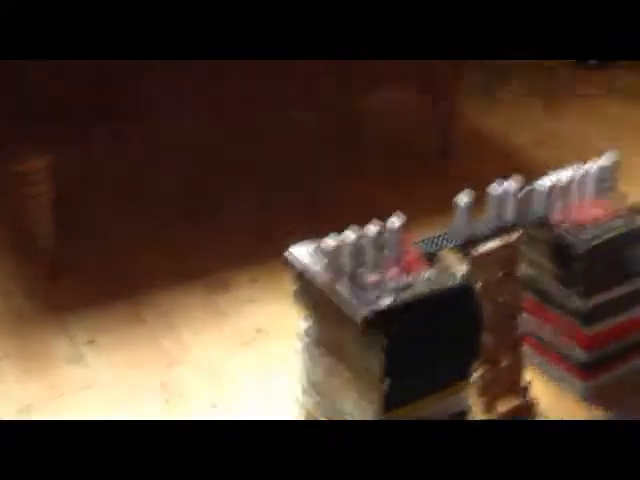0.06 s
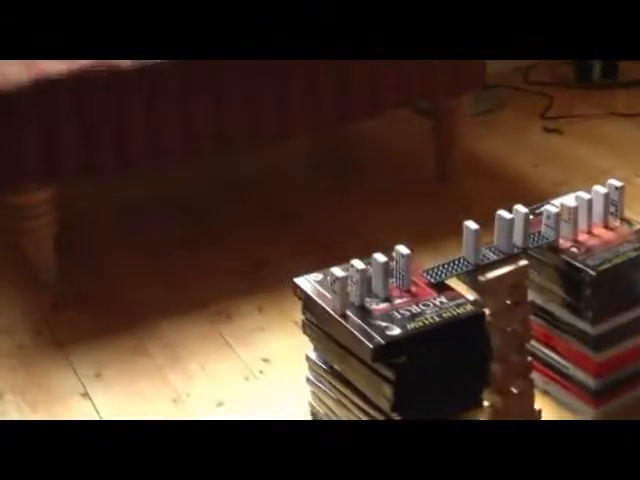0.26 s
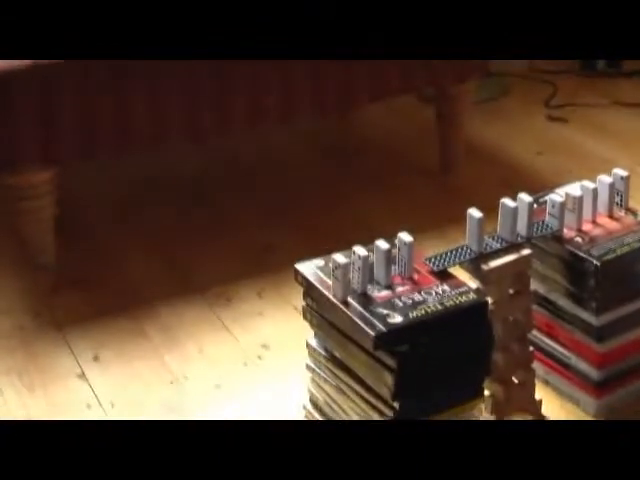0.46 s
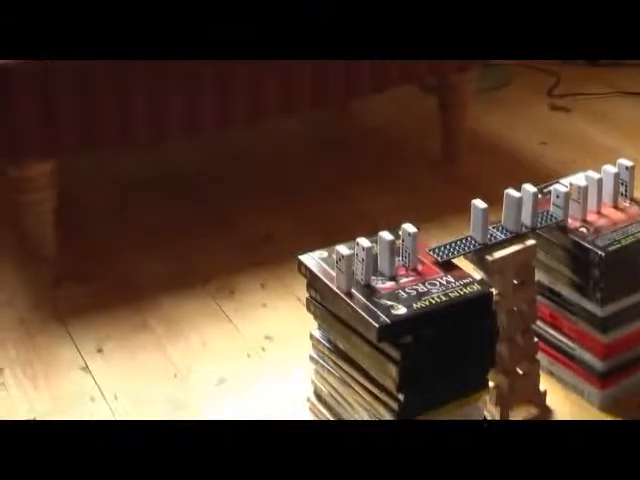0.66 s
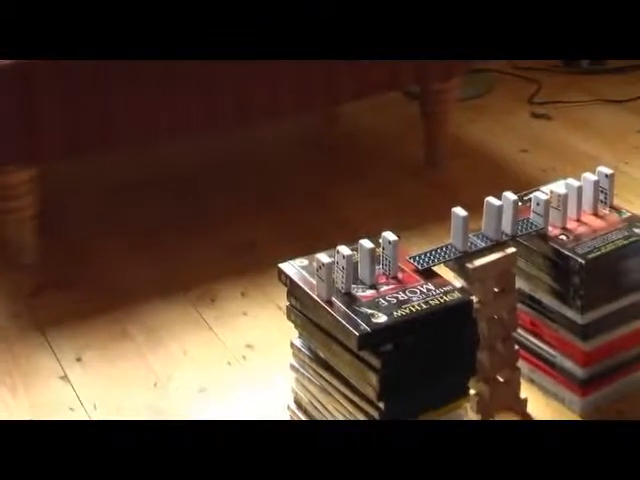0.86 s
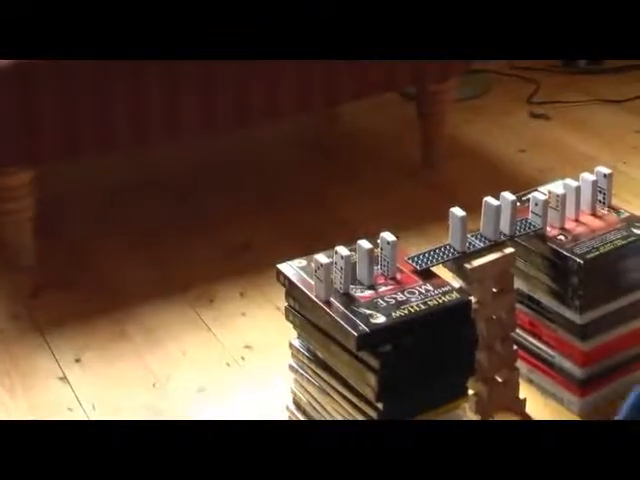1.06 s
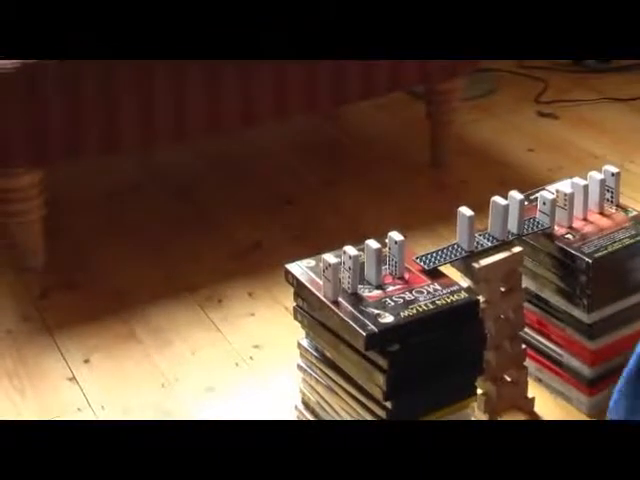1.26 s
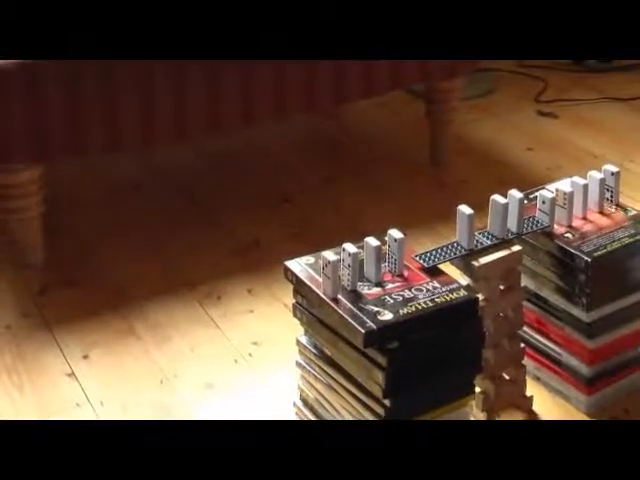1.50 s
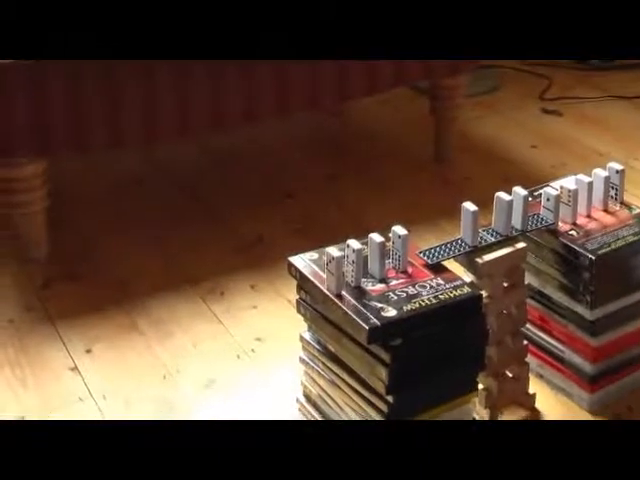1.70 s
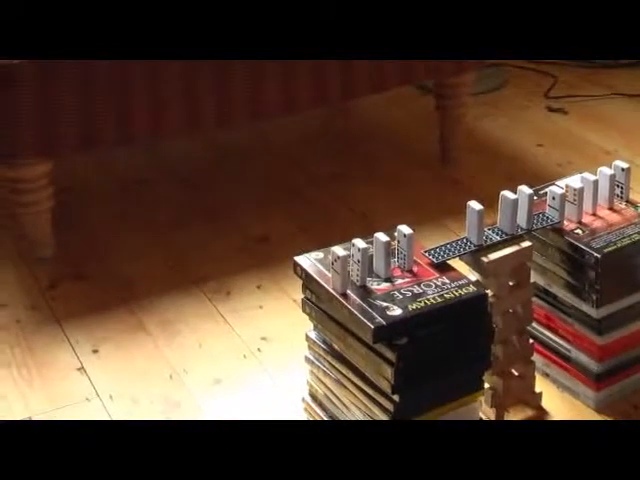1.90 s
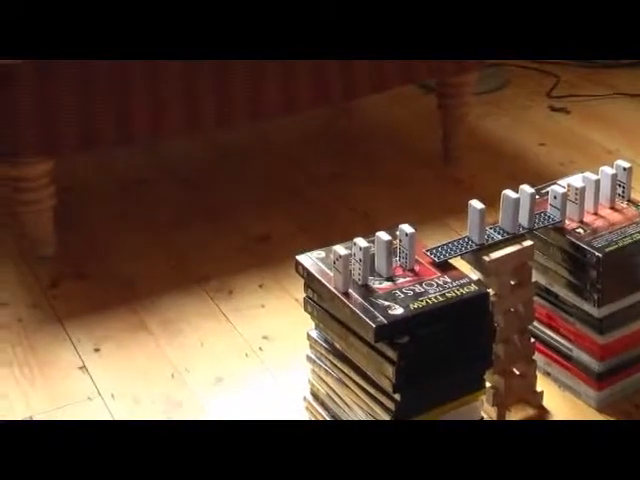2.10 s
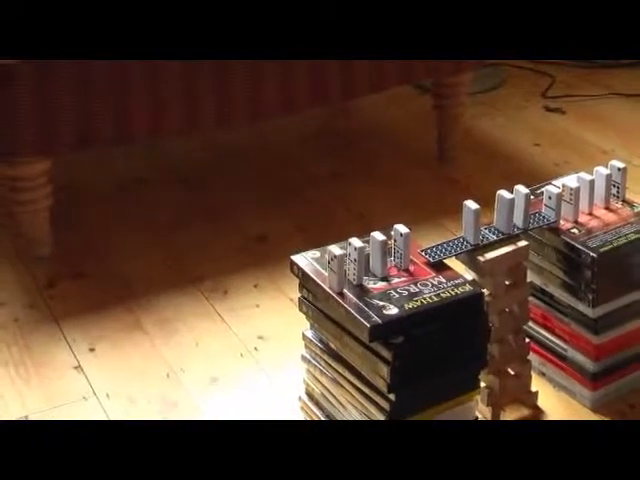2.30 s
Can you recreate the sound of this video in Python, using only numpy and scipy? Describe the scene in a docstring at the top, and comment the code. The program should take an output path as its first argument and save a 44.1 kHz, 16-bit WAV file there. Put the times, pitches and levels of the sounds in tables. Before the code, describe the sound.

Dominoes topple across stacks of books and disc cases, clacking and clattering indoors.

```python
"""A row of dominoes topples across stacks of books and disc cases in a live, wooden-floored room.
Tiles clack brightly against each other and knock on the hollow stacks; a dense clatter follows,
then a dull blow, a ringing tap on a case and a last crash whose pieces rattle to rest.
The stereo microphone has the row slightly to its right, far enough off to take in plenty of room."""
import sys
import numpy as np
from scipy import signal
from scipy.fft import rfft, irfft, next_fast_len
from scipy.io import wavfile

SR = 44100
rng = np.random.default_rng(int(sys.argv[2]) if len(sys.argv) > 2 else 0)


def wav_out(sig):
    """Save sig, one row per channel (or a flat mono array), as 16-bit PCM at SR to the path in sys.argv[1]."""
    wavfile.write(sys.argv[1], SR, np.round(np.clip(np.atleast_2d(sig).T, -1, 1) * 32767).astype(np.int16))


N = 108045


def amp(db):
    """Decibels to gain."""
    return 10 ** (np.asarray(db) / 20)


def curve_at(points, hz):
    """A curve's value on a log-frequency axis."""
    points_hz, values = np.transpose(points)
    return np.interp(np.log(hz + 1), np.log(points_hz), values)


def add(mix, start_s, sound):
    """Lays a sound into the mix."""
    part = mix[..., round(start_s * SR):][..., :sound.shape[-1]]
    part += sound[..., :part.shape[-1]]


def click(colour, size=2048):
    """The sharpest causal click that has the given colour (a function from Hz to dB)."""
    hz = abs(np.fft.fftfreq(size, 1 / SR))
    log_gain = np.log(amp(colour(hz)))
    return np.fft.ifft(np.exp(np.conj(signal.hilbert(log_gain)))).real


def ring(modes, detune=1, rise_s=0.00014):
    """A struck body rings with one dying tone per mode."""
    t = np.arange(16384) / SR
    tones = sum(amp(db - 60 * t / t60) * np.cos(2 * np.pi * hz * detune * t) for hz, db, t60 in modes)
    return (1 - np.exp(-t / rise_s)) * tones


def bend(sound, lag_s=0.001055, corner_hz=1620):
    """A bending cover spreads a blow in time: the lower waves arrive later."""
    size = 2 * len(sound)
    hz = np.fft.rfftfreq(size, 1 / SR)
    delay_s = lag_s / np.hypot(1, hz / corner_hz)
    phase = -2 * np.pi * np.cumsum(delay_s) * hz[1]
    return irfft(rfft(sound, size) * np.exp(1j * phase), size)[:len(sound)]


# How long the room rings: freq_hz, t60_s
ROOM_DECAY = [(100,0.35), (300,0.6), (800,0.58), (2000,0.5754), (4500,0.52), (8200,0.4944), (11500,0.38)]
# Colour of its echoes: freq_hz, level_db
ROOM_COLOUR = [(100, 1), (300, 3.5), (1000, 7.9), (3000, 7.4), (9000, 6.7)]
# Side against mid at the microphone: freq_hz, side_db
ROOM_WIDTH = [(100, -12.5), (400, -10), (1200, -8.5), (4000, -5.5), (9000, -6.5)]


def room_response(echo_db, build_s=0.002, early_db=5.5, early_t60_s=0.14, size=256):
    """Direct sound reaches the microphone, then dense echoes build up and die band by band."""
    t = np.arange(SR) / SR
    hz, frame_s, noise = signal.stft(rng.standard_normal((2, SR)), SR, nperseg=size)
    hz = hz[:, None]
    late = amp(-60 * frame_s / curve_at(ROOM_DECAY, hz))
    early = amp(early_db - 60 * frame_s / early_t60_s)
    fade = np.hypot(late, early)
    fade /= np.sqrt((fade ** 2).sum(1, keepdims=True) * size / 2)
    mid, side = noise * fade * amp(curve_at(ROOM_COLOUR, hz))
    side *= amp(curve_at(ROOM_WIDTH, hz))
    response = signal.istft(np.array([mid + side, mid - side]), SR, nperseg=size)[1][:, :SR]
    response *= amp(echo_db) * (1 - np.exp(-(t / build_s) ** 2))
    response[0, 1] += 1  # the direct sound reaches the left one sample late
    response[1, 0] += 1
    return response


# Lean to the right at the microphone: freq_hz, right_db
BALANCE = [(100, -2.1), (300, -0.61), (600, .5), (1300, 1.44), (9000, 0.78)]


def in_room(hits, echo_db=0, spot_count=7):
    """Hits land on several spots a little to the right, each with its own echoes."""
    spots, size = np.zeros((spot_count, N)), next_fast_len(N + SR)
    for k, (start_s, sound) in enumerate(hits):
        add(spots[k % spot_count], start_s, sound)
    heard = sum(rfft(spot, size) * rfft(room_response(echo_db), size) for spot in spots)
    right_db = curve_at(BALANCE, np.fft.rfftfreq(size, 1 / SR))
    return irfft(heard * amp([-right_db, right_db]), size)[:, :N]


# Colour of the room tone: freq_hz, level_db
ROOM_TONE = [(30,-37), (80,0), (200,4), (300,-0.5), (700,-8), (1500,-13), (4000,-22), (5500,-31.5),
             (9000,-23.5), (12000,-34.5)]


def room_tone(level_db=-50):
    """A quiet, low hush all around the microphone."""
    hz = np.fft.rfftfreq(N, 1 / SR)
    mid, side = rfft(rng.standard_normal((2, N))) * amp(curve_at(ROOM_TONE, hz))
    side *= amp(curve_at(ROOM_WIDTH, hz))
    air = irfft(np.array([mid + side, mid - side]), N)
    return amp(level_db) * air / air.std()


# Modes of the hollow case, the stiff cover and the whole stack: pitch_hz, level_db, t60_s
CASE_MODES = [(176.8,-13,0.44), (320,-26,0.077), (342.8,-7.5,0.29), (520.6,-8,0.3), (570.4,1,0.19),
              (689.5,-4,0.11), (921,-36,0.059), (1072,-9,0.19), (1310,-24,0.085), (2283,-8.5,0.24),
              (2500,-23,0.25), (4150,-34,0.043)]
COVER_MODES = [(1204, -23, 0.012)]
STACK_MODES = [(310, -44.5, 0.12)]
# Colour of a blow on a stack: freq_hz, level_db
KNOCK_COLOUR = [(40, -66.5), (90, -28.5), (170, -1.5), (300, 3), (550, 5), (800, 7), (1250, 0.5), (1800, 0),
                (2600, -4.5), (4000, -7), (5300, -28.5), (8000, -25), (12000, -51.5)]
# How much of a contact's bass_db and treble_db each frequency takes: freq_hz, share
BASS_SHARE = [(70,0.032), (160,0.0022), (310,1), (600,0.68), (1200,0)]
TREBLE_SHARE = [(1100,0), (1900,0.46), (3000,1)]
# Landings on the stacks: start_s, level_db, bass_db, treble_db, case_db, cover_db
STACK_LANDINGS = [(.004,-42,2,-17,-12,-10), (0.2157,-19.5,12,-19,7,6), (.2295,-15,8,-15.5,-29,7.5),
                  (.284,-18.5,2.5,-23,16,-17), (.318,-15.5,11,-2,-26,-22), (.362,-19,17.5,-12,-8,-24),
                  (.588,-26,11,-9,-8,12.5), (0.599,-26,7,-10,-4,0), (.61,-19,7,-3.5,2.5,8.5),
                  (.625,-23.5,10.5,-3,4.5,1), (.678,-18,11.5,-22,-24,-6), (.697,-13.5,2.5,-19,-12,-27),
                  (.708,-23,-4,-51,17.5,16.5), (0.8761,-8.5,3.5,4.5,-5,11), (.895,-14,10.5,16,-24,-12),
                  (.928,-8.5,3,4,-25,-3), (.943,-12.5,-6,10,1,0), (.967,-15.5,11,-7,1,-23),
                  (1.0035,-4.5,-0.5,2,-27,-2), (1.0688,-1,1.5,-6.5,4,6.5), (1.085,-0.5,0.5,-1,5,-15),
                  (1.097,-15,-30,12.5,-24,-22), (1.138,-7,-15,-11,-1,-8), (1.1882,-4,-0.5,-7,8,-2),
                  (1.203,-15,-1,-3.5,15,-16), (1.227,-3.5,0.5,-4.5,4,-25), (1.25,-9,-7,0,9,1),
                  (1.2755,-2,1.5,-6,0.5,-1), (1.291,-7,-4,1.5,3,-22), (1.311,-12.5,0.5,7,6.5,9),
                  (1.3303,-9.5,-14,11.5,-7,0), (1.352,-10.5,5,12,-13,-6), (1.399,-10,1,4,10.5,-14),
                  (1.412,-5.5,-0.5,3.5,0.5,-29), (1.432,-9,-6.5,1,-6,-29), (1.462,-8.5,-0.5,1,-3,5.5),
                  (1.489,-13,5,4.5,5,-1), (1.7032,1.5,3.5,-10.5,1.5,-14), (1.7087,2,-7,-25,-20,-11),
                  (1.728,-1,-1.5,-17.5,-8.5,-8), (1.737,-8,-0.5,-25,-7,-19), (2.036,1.5,2.5,-1.5,-17,6),
                  (2.044,-10.5,3,8,-4,-23), (2.0769,0.5,-4.5,-7,-8,-27), (2.092,-6,-18,5,-3,-24),
                  (2.123,-7.5,-8,-0.5,-8,-28), (2.158,-15.5,-25,5,-17,-8), (2.272,-18,3.5,-7,0,-28)]


def stack_knocks(gain_db=15.5, case_gain_db=-42, case_spread=0.02, cover_spread=0.083):
    """A tile or object lands: the case rings, the cover tocks and the stack gives a low thud."""
    hits = []
    for start_s, level_db, bass_db, treble_db, case_db, cover_db in STACK_LANDINGS:
        case = amp(case_gain_db + case_db) * ring(CASE_MODES, rng.normal(1, case_spread))
        cover = amp(cover_db) * ring(COVER_MODES, rng.normal(1, cover_spread))
        body = case + cover + ring(STACK_MODES)
        add(body, 0, click(lambda hz: curve_at(KNOCK_COLOUR, hz)))
        contact = click(lambda hz: bass_db * curve_at(BASS_SHARE, hz)
                        + treble_db * curve_at(TREBLE_SHARE, hz))
        knock = signal.fftconvolve(body, contact)[:len(body)]
        hits.append((start_s, amp(gain_db + level_db) * bend(knock)))
    return in_room(hits, echo_db=-2.5)


# Soft pushes into the wooden floor: start_s, level_db
FLOOR_PUSHES = [(.186,-18.5), (0.215,-19.5), (.52,-38), (1.074,-35), (1.444,-26), (2.037,-30)]


def floorboards(low_hz=82, upper_hz=165, upper_db=-3, rise_s=0.024, t60_s=0.14):
    """The boards give a low, quickly damped boom under the heavier movements."""
    booms, t = np.zeros((2, N)), np.arange(SR // 2) / SR
    envelope = (1 - np.exp(-t / rise_s)) * amp(-60 * t / t60_s)
    tones = np.sin(2 * np.pi * low_hz * t) + amp(upper_db) * np.sin(2 * np.pi * upper_hz * t)
    for start_s, level_db in FLOOR_PUSHES:
        add(booms, start_s, amp(level_db) * envelope * tones)
    right_db = curve_at(BALANCE, low_hz)
    return booms * amp([[-right_db], [right_db]])


# Colours of a clack and of its broadband snap: freq_hz, level_db
CLACK_COLOUR = [(1000, -14), (2600, -13), (4100, -1.5), (5000, -10), (6500, -67), (7650, -7), (8180, 11),
                (8700, -4.5), (9120, 10), (9550, -2), (10500, -11), (12000, -24)]
SNAP_COLOUR = [(500, -65), (2000, -36), (4000, -3.5), (5800, -10), (7500, -4), (10300, -9.5), (12000, -23)]
# Free ring of the tiles: pitch_hz, level_db, t60_s
TILE_MODES = [(8097, -1, .5), (8270, -2, .45), (9030, -3, .35), (9135, -4, .5), (9195, -2, .4)]
# Tile against tile along the row: start_s, level_db, snap_db
TILE_COLLISIONS = [(0.23, -5, -4.5), (.237, -4.5, -4), (0.255, -6, -10), (0.286, -12, 1.5),
                   (0.326, -10.5, -10.5), (0.3647, -7, -8), (0.384, -14.5, 5.5), (0.622, -16.5, -1),
                   (0.632, -17, 3.5), (0.644, -22, -26), (.655, -21.5, -19), (0.8785, -21, 11),
                   (1.0034, -20, -1), (1.0129, -15.5, 10.5), (1.1886, -26.5, -5), (1.2754, -26, -26),
                   (1.3286, -25, 10), (1.339, -29, 16), (1.377, -24.5, -3), (1.415, -24.5, -13),
                   (1.4734, -15, 4), (1.5, -31, 3), (2.037, -14.5, 12), (2.0438, -23, 11), (2.059, -18, 12),
                   (2.0839, -8, -7), (2.1, -16.5, 12.5), (2.212, -29.5, 14), (2.269, -32.5, 13)]


def tile_clacks(gain_db=16, ring_db=-47, pitch_spread=0.00201):
    """Hard tiles meet: a snap, two strong high resonances and a faint lasting ring."""
    hits = []
    for start_s, level_db, snap_db in TILE_COLLISIONS:
        def colour(hz):
            resonances = amp(curve_at(CLACK_COLOUR, hz))
            snap = amp(snap_db + curve_at(SNAP_COLOUR, hz))
            return 20 * np.log10(np.hypot(resonances, snap))

        clack = amp(ring_db) * ring(TILE_MODES, rng.normal(1, pitch_spread))
        add(clack, 0, click(colour))
        hits.append((start_s, amp(gain_db + level_db) * clack))
    return in_room(hits, echo_db=-2.5)


# Colour of one small contact: freq_hz, level_db
RATTLE_COLOUR = [(100,-27.5), (300,-3), (550,2), (1200,1.5), (1900,-1.5), (2700,-9), (4000,-11.5),
                 (5500,-25), (12000,-49)]
# Tiles skidding and chattering between the knocks: start_s, end_s, level_db, treble_db
TILE_SKIDS = [(0.245,0.492,-12,-5), (0.539,0.717,-14,-16), (0.881,1.061,-1,1), (1.113,1.325,-0.5,-8),
              (1.33,1.547,-4,6.5), (2.062,2.288,-7.5,5.5), (2.303,2.386,-16.5,-0.5)]


def tile_rattles(contacts_per_s=260, spread_db=1.5):
    """Sliding and settling tiles make many small, unevenly spaced contacts."""
    contact_samples = ((np.arange(SR) + rng.random(SR)) * SR / contacts_per_s).astype(int)
    strengths = amp(spread_db * rng.standard_normal(N)) * rng.choice([-1, 1], N)
    contacts = strengths * np.isin(np.arange(N), contact_samples)
    hits = []
    for start_s, end_s, level_db, treble_db in TILE_SKIDS:
        tick = click(lambda hz: curve_at(RATTLE_COLOUR, hz) + treble_db * curve_at(TREBLE_SHARE, hz))
        chatter = signal.fftconvolve(contacts[round(start_s * SR):round(end_s * SR)], bend(tick))
        hits.append((start_s, amp(level_db) * chatter))
    return in_room(hits, spot_count=3)


# Modes of a thin plastic case: pitch_hz, level_db, t60_s
THIN_CASE_MODES = [(615,3,0.064), (1270,-1,0.12), (1456,1.5,0.083), (2110,-4,0.12), (2290,1.5,0.093),
                   (2620,-2,0.12), (3030,-3,0.1), (3494,-8,.2), (3740,-9,0.26)]
# Colour of a tap on it: freq_hz, level_db
TAP_COLOUR = [(150,-31), (350,-25), (560,14.5), (800,3.5), (1300,4), (2600,-3), (4200,-7.5), (5500,-20.5),
              (12000,-27)]
# A quick bounce just before the last crash: start_s, level_db
CASE_BOUNCES = [(1.9095, 6.5), (1.9135, 3.5)]


def case_taps(ring_db=-42):
    """Something light bounces on a thin case, which rings clearly."""
    tap = amp(ring_db) * ring(THIN_CASE_MODES)
    add(tap, 0, click(lambda hz: curve_at(TAP_COLOUR, hz)))
    hits = [(start_s, amp(level_db) * bend(tap)) for start_s, level_db in CASE_BOUNCES]
    return in_room(hits, spot_count=2)


def scene():
    """The toppling row and the quiet room, heard from where the microphone stands."""
    return room_tone() + stack_knocks() + floorboards() + tile_clacks() + tile_rattles() + case_taps()


def record(dry):
    """The microphone sheds deep bass, rounds off the loudest peaks and loses the highest treble."""
    low_cut_hz, ceiling, high_cut_hz = 75, 0.92, 11600
    thinned = signal.sosfilt(signal.butter(3, low_cut_hz, "highpass", fs=SR, output="sos"), dry)
    rounded = thinned / (1 + (thinned / ceiling) ** 4) ** (1 / 4)
    high_cut = signal.firwin(511, high_cut_hz, window=("kaiser", 9), fs=SR)
    return signal.oaconvolve(rounded, high_cut[None], "same")


dry = scene()
out = record(dry)
wav_out(out)
```